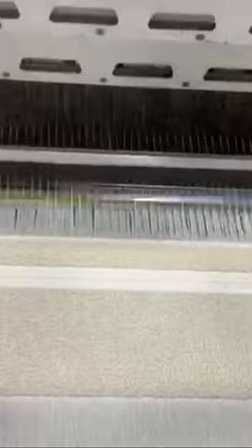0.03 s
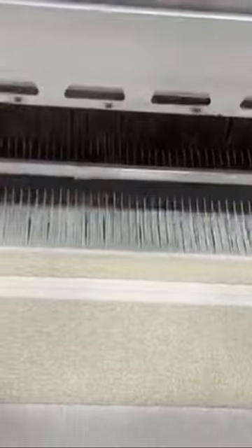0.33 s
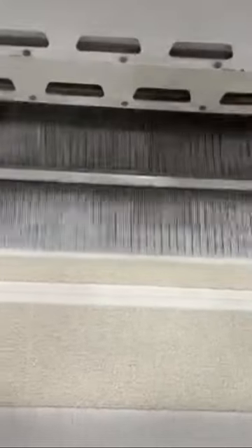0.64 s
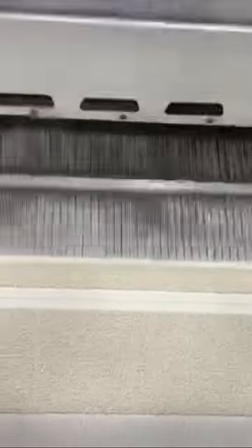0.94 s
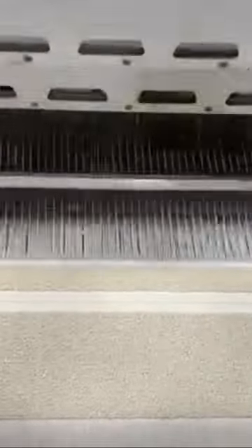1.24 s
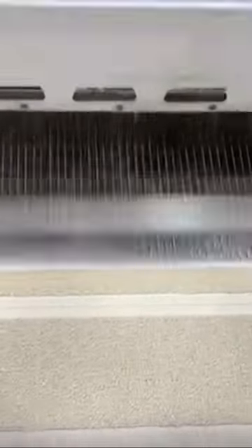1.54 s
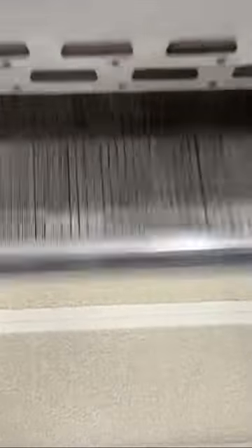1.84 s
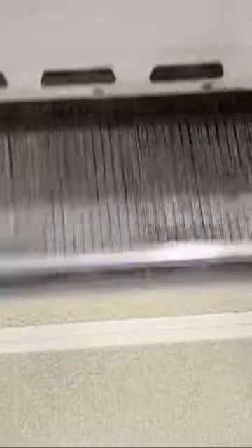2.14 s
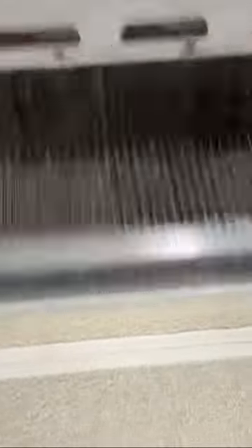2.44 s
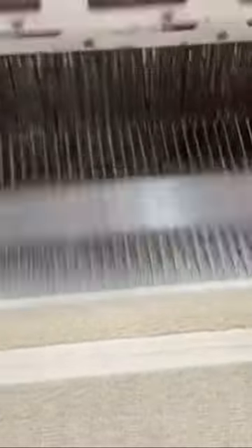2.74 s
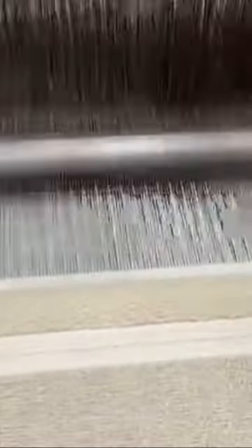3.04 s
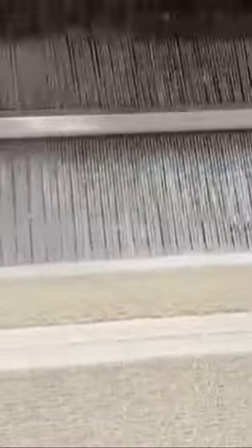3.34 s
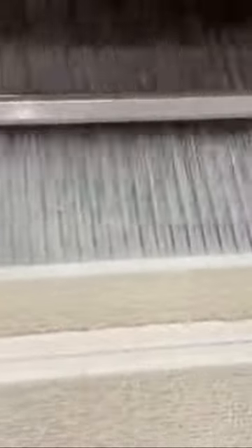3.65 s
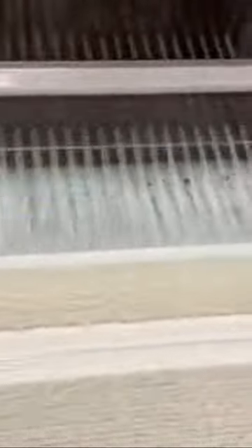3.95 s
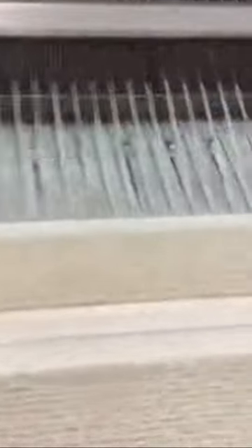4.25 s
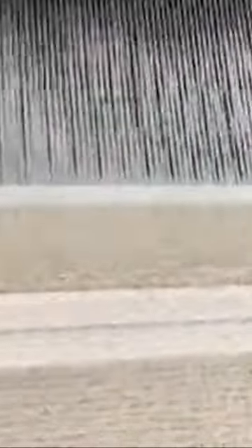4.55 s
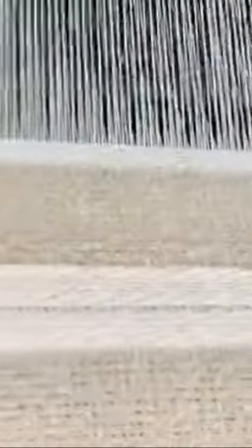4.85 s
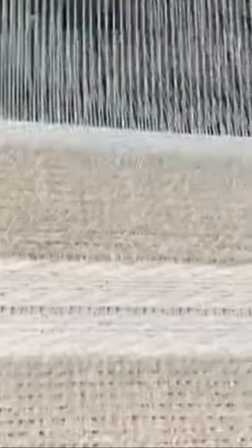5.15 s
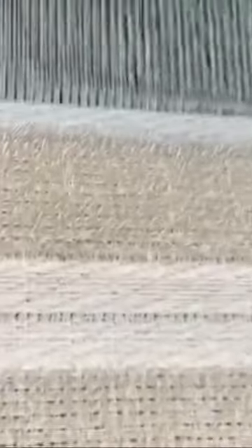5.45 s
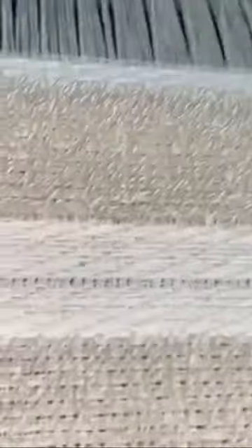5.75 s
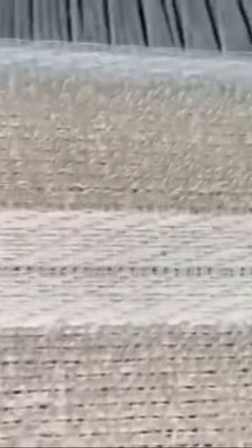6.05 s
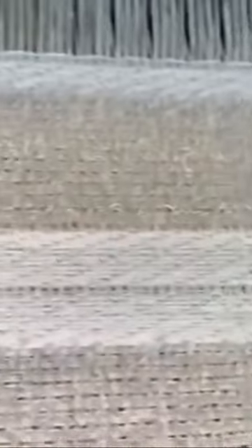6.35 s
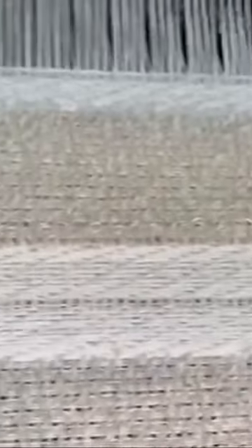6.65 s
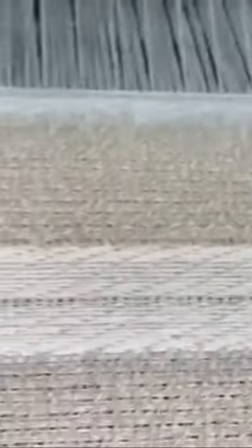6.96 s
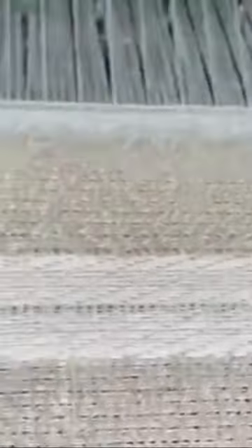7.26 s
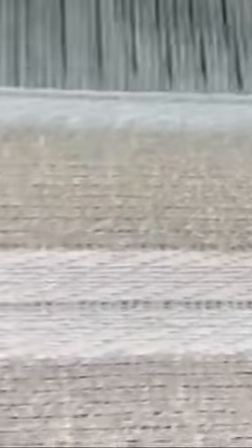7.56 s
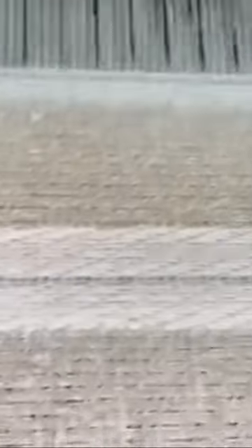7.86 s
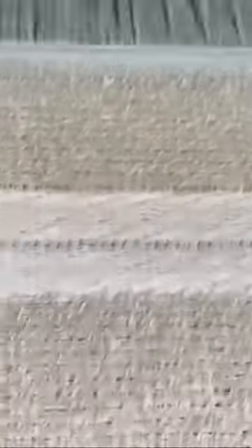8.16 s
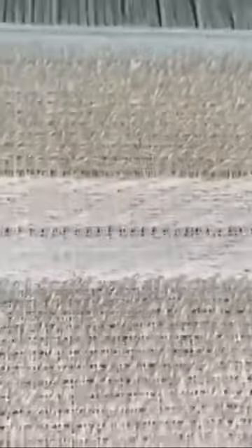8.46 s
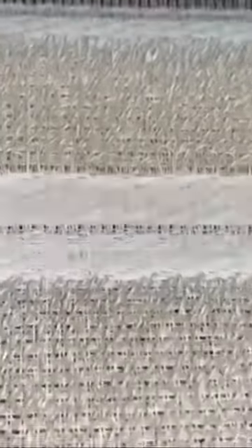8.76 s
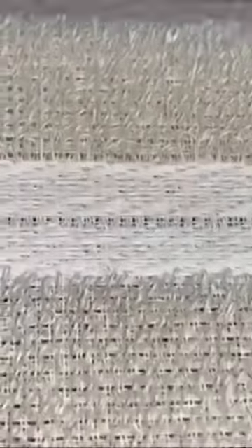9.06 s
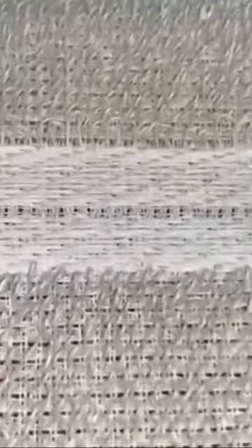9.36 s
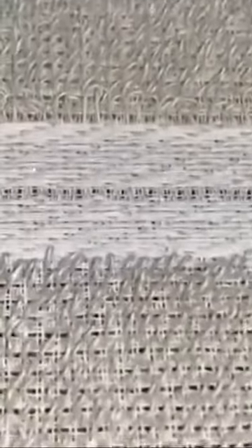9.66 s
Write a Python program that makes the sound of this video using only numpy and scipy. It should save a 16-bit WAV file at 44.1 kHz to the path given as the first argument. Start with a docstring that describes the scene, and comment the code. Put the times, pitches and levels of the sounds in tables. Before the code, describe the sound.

Weaving machines clatter continuously, their drives roaring and thumping while metal parts rattle and yarn hisses close by.

```python
"""A power loom at about 190 picks a minute in a factory hall, stereo microphone just above the cloth.
From the start the drive roars and thumps and yarn hisses. At every pick the shed closes with a rattle of
healds, the reed clacks against the cloth and the next shed opens; the weave decides how many frames move.
A slightly slower loom next to it drifts in and out of step. Soon low knocks boom, a cover bangs and heald
frames slap; later, as the microphone closes in on the reed, warp threads scrape and steel strips ping."""
import sys
import numpy as np
from scipy import signal
from scipy.fft import rfft, irfft, next_fast_len
from scipy.io import wavfile
from scipy.ndimage import uniform_filter1d, map_coordinates

SR = 44100
rng = np.random.default_rng(int(sys.argv[2]) if len(sys.argv) > 2 else 0)


def wav_record(signal):
    """Record a signal, one row per channel, as 16-bit PCM in the file named by sys.argv[1]."""
    frames = np.transpose(np.atleast_2d(signal))
    bounded = np.clip(frames, -1, 1)
    # unit amplitude maps onto the largest positive 16-bit level
    quanta = np.round(bounded * 32767).astype(np.int16)
    wavfile.write(sys.argv[1], SR, quanta)


N = 436590
T = np.arange(N) / SR

# picks of the loom under the microphone: (beat-up [s], clack [dB], ring centre [Hz],
# rattle of the closing shed [dB], rattle of the opening shed [dB], sley thump [dB])
PICKS = [(.176,-21.5,2250,3,-3,-32), (.496,-22.5,2300,6,0.5,-28), (0.804,-28,2030,3,0,-30),
         (1.126,-15.5,2340,2.5,4,-32), (1.434,-23,2230,4.5,1,-23), (1.754,-21,1830,5.5,1.5,-23),
         (2.069,-20.5,2060,3,-1,-22), (2.383,-15.5,2530,-0.5,4,-33), (2.695,-18.5,2400,0.5,0.5,-19),
         (3.012,-12.5,2420,3.5,-.5,-30), (3.325,-24.5,2020,0,3.5,-22), (3.643,-24,1950,1,5.5,-16),
         (3.953,-19.5,2040,1.5,1.5,-28), (4.273,-17,1900,2.5,1,-14), (4.586,-19.5,1840,1.5,-.5,-23),
         (4.901,-18.5,1800,1.5,1.5,-28), (5.216,-13.5,1730,6,2.5,-24), (5.531,-19,1780,1,5,-22),
         (5.846,-19,2170,2,-0.5,-20), (6.161,-15.5,1970,1.5,-0.5,-33), (6.478,-17,1910,-.5,-2,-24),
         (6.794,-22.5,2280,-.5,3,-19), (7.108,-18,2060,0.8,-1,-17), (7.424,-17,1800,4.5,1,-16),
         (7.737,-14.5,1950,2,1,-33), (8.051,-13.5,2240,-1.5,1,-30), (8.365,-15.5,1950,0.5,-2,-15),
         (8.682,-22,2060,4.5,-.5,-12), (8.997,-18,1960,3.5,-3,-15), (9.312,-15.5,2180,1.5,3.5,-22.5),
         (9.623,-14.5,1460,1,1,-11), (9.94,-20,2000,4.5,6,-20)]
# turns of the next loom, heavier or lighter with its weave: (swell of the roar [dB])
NEXT_SWELLS = [0.78, 0.65, 0.64, 0.77, 1, 1.8, 0.63, 1, .3, 0.59, 0.85, 1.6, 2.8, 0.94, 2.7, 3.7, 3.2, 2.9,
               1.6, 0.86, 2.3, 1.9, 1.3, 1.6, 1.7, 1.5, 1.3, 0.25, 1.3, 0.79]
NEXT_TURNS_S = .155 + .3306 * np.arange(len(NEXT_SWELLS))
# phases of a pick: (time after the beat-up [s], half length [s])
CLOSING, OPENING = (-.077, .059), (.06, .063)
BEAT_UP, SWISH, HANDOVER = (-.002, .024), (-.0032, .045), (.15, .031)
LEFT_LAG_S = .00011  # a clack's ring reaches the left capsule this much later


def amp(db):
    """Decibels to gain."""
    return 10 ** (np.asarray(db) / 20)


def unit(x):
    """Scale to rms 1."""
    return x / np.sqrt(np.mean(x ** 2) + 1e-20)


def along(points, hz):
    """(Hz, value) points read on a log axis."""
    f, v = np.transpose(points)
    return np.interp(np.log(hz + 1), np.log(f + 1), v)


def curves(rows):
    """One value per sample for each column after the time."""
    s, *columns = np.transpose(rows)
    return [np.interp(T, s, column) for column in columns]


def wobble(rate):
    """A smooth random curve, rate knots a second."""
    return map_coordinates(rng.standard_normal(int(N * rate / SR) + 4), [T * rate])


def filtered(x, response):
    """x through a complex frequency response."""
    n = x.shape[-1]
    m = next_fast_len(n + 8192)
    return irfft(rfft(x, m) * response(np.fft.rfftfreq(m, 1 / SR)), m)[..., :n]


def coloured(x, spectrum):
    """x shaped by (Hz, dB) points."""
    return filtered(x, lambda hz: amp(along(spectrum, hz)))


def resonate(x, modes):
    """x through a bank of (Hz, width in Hz, dB) resonances."""
    return filtered(x, lambda f: sum(amp(db) * 1j * f * width / (hz * hz - f * f + 1j * f * width)
                                     for hz, width, db in modes))


def add(track, s, sound):
    """Mix a sound into a track at time s."""
    part = track[..., max(round(s * SR), 0):][..., :sound.shape[-1]]
    part += sound[..., :part.shape[-1]]


def surge(starts, phase, height):
    """A curve that swells by height (one value, or one per start) at the same phase after every start."""
    late_s, half_s = phase
    t = T[::64]
    bells = np.exp(-((t[:, None] - starts - late_s) / half_s) ** 2)
    return np.interp(T, t, (bells * height).sum(axis=1))


def every_pick(phase, db):
    """A swell in dB at one phase of every pick."""
    return surge(np.transpose(PICKS)[0], phase, db)


def shedding():
    """Rise in dB as the heald frames move: once before each beat-up and once after it."""
    _, _, _, closing_db, opening_db, _ = np.transpose(PICKS)
    return every_pick(CLOSING, closing_db) + every_pick(OPENING, opening_db)


def placed(pair):
    """Two unrelated signals become left and right: alike in the bass, leaning left in the treble."""
    # likeness of the two capsules: (frequency [Hz], correlation [0..1])
    likeness = [(60, .998), (110, 1), (170, 0.68), (330, 0.88), (550, 0.99), (1100, 0), (5000, 0)]
    # balance at the microphone: (frequency [Hz], left minus right [dB])
    balance = [(190, 0), (330, -1.1), (580, 4), (1050, 4), (1750, 3.5), (2500, -1.5), (3300, 2),
               (5700, 9.5), (9500, 5.5)]
    width = lambda hz: np.arccos(np.clip(along(likeness, hz), -1, 1)) / 2
    pan = lambda hz: np.arctan(amp(along(balance, hz)))
    mid, side = filtered(pair, lambda hz: np.array([np.cos(width(hz)), np.sin(width(hz))]))
    stereo = np.array([mid + side, mid - side])
    return unit(filtered(stereo, lambda hz: np.array([np.sin(pan(hz)), np.cos(pan(hz))])))


def clatter(rate, life_s, spread_db, wash_db):
    """Many small contacts, each a short burst, over the wash that the hall makes of them."""
    hits = (rng.random(N) < rate / SR) * amp(spread_db * np.clip(rng.standard_normal(N), -2, 2)) ** 2
    power = signal.lfilter([1], [1, -np.exp(-2 / (life_s * SR))], hits)
    return unit(rng.standard_normal((2, N)) * np.sqrt(power / power.mean() + amp(wash_db) ** 2))


def mottled(pair, depth_db):
    """A random mottle in pitch and time gives a noise a coarser grain."""
    spectra = signal.stft(pair, nperseg=1024)[2]
    mottle = uniform_filter1d(uniform_filter1d(rng.standard_normal(spectra.shape[1:]), 3, 0), 4, 1)
    return unit(signal.istft(spectra * amp(depth_db * unit(mottle)), nperseg=1024)[1][:, :N])


def drive_roar(level_db, frame_db, closing_db, opening_db, waver_db):
    """Gears and cams knock densely on the frame, which booms; the next loom adds its own beat."""
    # roar of the gears: (frequency [Hz], level [dB])
    spectrum = [(14, -48), (25, -26.5), (42, -18), (65, -10), (90, -6), (128, -5), (170, -2), (260, -1.5),
                (360, 0), (430, -2), (650, -5), (1000, -10), (1500, -21), (2500, -65)]
    # resonances of the frame and its covers: (frequency [Hz], width [Hz], level [dB])
    frame_modes = [(93, 33, 0.5), (170, 10.5, 3.5), (203.4, 5.9, -5.5), (320, 35, -0.5), (363, 16, .5),
                   (480, 27, -7.5), (639, 22, -5.5), (783.5, 28, -2)]
    # the microphone moves over the cloth: (time [s], level [dB], boom [dB], bark [dB])
    mic_path = [(0, -23, 0.5, -2.5), (1.3, -24, 1, -1), (2.2, -23.5, -1, -1), (3.4, -25, 4, 2),
                (4.4, -25, 4, 0.5), (5.3, -24.5, 3.5, 0.5), (6.5, -24, 3.5, 2.5), (8, -24, 4, 2.5),
                (9, -24.5, 3.5, 4), (9.9, -23, 4, 4)]
    near_db, boom_db, bark_db = curves(mic_path)
    knocks = unit(coloured(clatter(rate=120, life_s=.0092, spread_db=2.5, wash_db=7), spectrum))
    frame = unit(resonate(clatter(rate=70, life_s=.012, spread_db=3.5, wash_db=-1), frame_modes))
    roar = placed(knocks + amp(frame_db) * frame)
    boom = (amp(boom_db) - 1) * resonate(roar, [(190, 100, 0)])
    bark = (amp(bark_db) - 1) * resonate(roar, [(650, 400, 0)])
    next_loom_db = surge(NEXT_TURNS_S, (0, .098), np.array(NEXT_SWELLS))
    effort_db = every_pick(CLOSING, closing_db) + every_pick(OPENING, opening_db) + next_loom_db
    return amp(level_db + near_db + effort_db + waver_db * wobble(9)) * (roar + boom + bark)


def heald_rattle(level_db, follow, beat_db):
    """Steel healds rattle in their frames as the shed closes and opens, and shake at the beat-up."""
    # dry steel rattle: (frequency [Hz], level [dB])
    spectrum = [(600, -13), (1000, -3), (1250, -2.5), (1700, -1), (2500, -1), (3100, -7.5), (4000, -26.5),
                (7000, -74.5)]
    rattle = mottled(clatter(rate=340, life_s=.0087, spread_db=3, wash_db=2.5), depth_db=2.5)
    effort_db = follow * shedding() + every_pick(BEAT_UP, beat_db)
    return amp(level_db + effort_db + .72 * wobble(30)) * placed(coloured(rattle, spectrum))


def yarn_hiss(level_db, follow, swish_db, handover_db):
    """Yarn slides through steel guides with the shed and the reed; the weft is handed on with ticks."""
    # sliding yarn: (frequency [Hz], level [dB])
    spectrum = [(1800, -18.5), (3000, -1), (3900, 0), (4800, -1), (6300, -0.5), (7500, -5.5), (8500, -13),
                (9200, -19.5), (9800, -89)]
    # light contacts of the weft mechanism: (time after the beat-up [s], level [dB], length [s])
    weft_ticks = [(-.01, -30.5, 0.0063), (0.157, -33.5, .005), (0.206, -33.5, 0.0067)]
    effort_db = follow * shedding() + every_pick(SWISH, swish_db) + every_pick(HANDOVER, handover_db)
    rub_gain = amp(level_db + effort_db + .47 * wobble(30))
    rub = rub_gain * clatter(rate=810, life_s=.0029, spread_db=10, wash_db=13.5)
    ticks, t = np.zeros(N), np.arange(SR // 10) / SR
    for beat_s, *_ in PICKS:
        for s, db, length in weft_ticks:
            size, late = rng.standard_normal(2)
            pulse = t / length * np.exp(1 - t / length)
            add(ticks, beat_s + s - length + .001 * late, amp(db + 1.8 * size) * pulse)
    yarn = rub + ticks * rng.standard_normal((2, N))
    return np.std(yarn) * placed(coloured(mottled(yarn, depth_db=2.5), spectrum))


def steel_hits(hits, spectrum, ring_db, rise_s, spray_db, spray_s, hall_db, hall_t60):
    """Steel lands on steel at each (s, dB, Hz): a ring, reflections off the covers, then the hall."""
    # modes of the steel: (ratio to the ring centre, level [dB], t60 [s])
    modes = [(.38, -12, .04), (.85, -6, .026), (1, 0, .036), (1.2, -5, .026), (1.45, -7.5, .02)]
    track, t = np.zeros((2, N)), np.arange(-SR // 50, SR // 6) / SR
    landing, after = np.exp(-(np.minimum(t, 0) / rise_s) ** 2), np.maximum(t, 0)
    tail = amp(spray_db) * np.exp(-after / spray_s) + amp(hall_db - 60 * after / hall_t60)
    arrival = t - np.array([[LEFT_LAG_S], [0]])
    for s, db, hz in hits:
        ring = 0
        for ratio, mode_db, t60 in modes:
            phase = rng.random() + rng.normal(0, .08, (2, 1))
            decay = amp(mode_db + rng.normal(0, 1, (2, 1)) - 60 * after / t60)
            ring = ring + decay * np.sin(2 * np.pi * (ratio * hz * arrival + phase))
        spray = unit(coloured(rng.standard_normal((2, len(t))), spectrum))
        add(track, s + t[0], amp(db) * landing * (amp(ring_db) * ring + tail * spray))
    return track


def reed_clacks(lead_s, rebound_s, rebound_db):
    """The reed meets the cloth just before the end of its stroke, then bounces once."""
    # scattered clack: (frequency [Hz], level [dB])
    spectrum = [(700, -36), (1250, -17), (1600, 7.5), (2300, -5), (2700, 5), (3300, -10), (6000, -29.5)]
    contacts = [(s - lead_s, db, hz) for s, db, hz, *_ in PICKS]
    rebounds = [(s + rebound_s, db + rebound_db, hz) for s, db, hz, *_ in PICKS]
    return steel_hits(contacts + rebounds, spectrum, ring_db=.5, rise_s=.0012,
                      spray_db=-7, spray_s=.007, hall_db=-21, hall_t60=.3)


def drive_thumps(cam_db, return_db, floor_db, scatter_db, rise_s):
    """The sley and the shedding cams reverse and shake the frame, and the floor answers."""
    # knocks of sley, cam, sley's return and floor: (time after the beat-up [s], pitch [Hz], t60 [s])
    knocks = [(0.0235, 90.3, 0.13), (0.17, 93, 0.17), (.092, 101.2, 0.23), (.184, 62, .13)]
    track, t = np.zeros(N), np.arange(SR // 4) / SR
    for beat_s, *_, sley_db in PICKS:
        for (s, hz, t60), db in zip(knocks, (sley_db, cam_db, return_db, floor_db)):
            softer, detune, late = rng.standard_normal(3)
            envelope = amp(db - scatter_db * softer - 60 * t / t60) * (1 - np.exp(-t / rise_s))
            ring = np.sin(2 * np.pi * hz * (1 + .039 * detune) * t)
            add(track, beat_s + s + .0016 * late, envelope * ring)
    return track


def low_knocks(level_db, cycles, bass_db, bass_hz):
    """Booming low knocks, many of them from the next loom beating up, each over a faint bass pulse."""
    # booming knocks: (time [s], level [dB], pitch [Hz])
    knocks = [(0.408,-20,310), (.443,-21,326), (.497,-23,100), (.853,-24,315), (1.187,-19,380),
              (1.215,-21,470), (1.367,-19.5,346), (1.432,-18,326), (1.595,-27,93), (1.92,-27,93),
              (2.406,-24,320), (2.462,-18,340), (2.55,-21.5,280), (2.795,-28,92), (3.097,-28,100),
              (3.143,-25,288), (3.175,-26,330), (3.276,-21,313), (4.077,-29,100), (4.116,-20,243),
              (4.15,-23,265), (4.431,-16,230), (4.543,-18.5,320), (4.759,-21,290), (4.797,-19,337),
              (4.889,-20,330), (5.083,-19,272), (5.172,-20,305), (5.41,-19,286), (5.446,-15.5,367),
              (5.465,-23,446), (5.491,-18.5,318), (5.769,-23,334), (5.968,-26,92), (6.11,-26,300),
              (6.517,-20,330), (6.727,-17,344), (6.779,-22,268), (6.828,-25,295), (7.09,-22,300),
              (7.698,-17,330), (7.706,-25.5,89.5), (7.736,-25,292), (7.773,-21,314), (7.96,-33,96),
              (8.122,-20.5,243), (8.465,-23,250), (8.529,-26,92), (8.704,-22,344), (9.307,-20.5,320),
              (9.35,-18,450), (9.471,-19,486), (9.672,-22,260)]
    track, t = np.zeros(N), np.arange(-SR // 20, SR // 6) / SR
    bass = amp(bass_db) * np.exp(-(bass_hz * t) ** 2) * np.sin(2 * np.pi * bass_hz * t)
    for s, db, hz in knocks:
        age = hz * t / cycles
        envelope = np.exp(np.where(age < 0, -(2 * age) ** 2, -age))
        boom = envelope * np.sin(2 * np.pi * (hz * t + rng.random()))
        add(track, s + t[0] - .003, amp(level_db + db) * (boom + bass))
    return track


def next_loom_thuds(level_db, hz, late_s, half_s):
    """Once a turn the next loom sends a deep thud through the floor."""
    track, t = np.zeros(N), np.arange(-SR // 10, SR // 10) / SR
    envelope = amp(level_db) * np.exp(-(t / half_s) ** 2)
    for s in NEXT_TURNS_S:
        add(track, s + late_s + t[0], envelope * np.sin(2 * np.pi * (hz * t + rng.random())))
    return track


def cover_bangs(level_db, rise_s, decay_s):
    """A loose sheet cover, a little to the left, chatters against the frame with a hollow bang."""
    # hollow colour of the cover: (frequency [Hz], level [dB])
    spectrum = [(250, -40), (470, 1.5), (620, 4), (760, -0.5), (1200, -41)]
    # bangs of the cover: (time [s], level [dB])
    bangs = [(.845,-27.5), (1.16,-23), (1.335,-27.5), (1.583,-25.5), (2.111,-27), (2.92,-28.5),
             (3.135,-23.5), (3.736,-24.5), (4.315,-24.5), (5.552,-23), (6.874,-25), (7.138,-23.5),
             (7.744,-21), (8.068,-21.5), (8.2,-22), (8.729,-22.5), (9.018,-22.5), (9.35,-22.5),
             (9.387,-22.5), (9.466,-24), (9.664,-26)]
    track, t = np.zeros((2, N)), np.arange(-SR // 20, SR // 6) / SR
    envelope = np.exp(np.where(t < 0, -(t / rise_s) ** 2, -t / decay_s))
    envelope_rms = np.sqrt(np.mean(envelope ** 2))
    for s, db in bangs:
        chatter = coloured(rng.standard_normal(len(t)), spectrum)
        add(track, s + t[0] - .003, amp(level_db + db) * envelope_rms * unit(chatter * envelope))
    return track * amp([[1.7], [-1.7]])


def heald_slaps(ring_hz, spread_hz):
    """Heald frames slap against their guides, each time ringing at a slightly different pitch."""
    # slaps on the guides: (time [s], level [dB])
    slaps = [(1.202,-26), (1.68,-25.5), (2.907,-24.5), (3.312,-22), (3.725,-25.5), (4.17,-22), (5.14,-20.5),
             (5.545,-26.5), (5.832,-21.5), (6.873,-22.5), (7.329,-18.5), (7.686,-21), (7.725,-20),
             (7.822,-24), (8.975,-20.5), (9.032,-17.5), (9.382,-21), (9.674,-22.5), (9.838,-18)]
    # scattered slap: (frequency [Hz], level [dB])
    spectrum = [(700, -12), (1300, 7), (1800, 10), (2600, -1), (3500, -3), (6300, -8), (9000, -30)]
    hits = [(s, db, rng.normal(ring_hz, spread_hz)) for s, db in slaps]
    return steel_hits(hits, spectrum, ring_db=-1, rise_s=.007,
                      spray_db=-6, spray_s=.015, hall_db=-15, hall_t60=.22)


def warp_scrapes(level_db, half_s):
    """Taut threads drag through the healds and the reed: a brief, grainy, metallic swish."""
    # drags of the warp: (time [s], level [dB])
    drags = [(2.464,-31.5), (3.648,-35), (3.72,-32), (4.9,-27), (5.14,-25), (5.54,-30.5), (5.838,-31),
             (6.35,-31), (6.82,-32), (6.96,-31.5), (9.312,-28), (9.38,-33.5), (9.625,-25.5)]
    # thread on steel: (frequency [Hz], level [dB])
    spectrum = [(1800, -26), (3400, 1.5), (6300, -4.5), (7800, -12.5), (9500, -28.5)]
    grains = mottled(clatter(rate=600, life_s=.003, spread_db=6, wash_db=1), depth_db=1.5)
    times, db = np.transpose(drags)
    return surge(times, (0, half_s), amp(level_db + db)) * placed(coloured(grains, spectrum))


def strip_pings(rise_s):
    """Now and then one steel strip is left free to ring at a clear pitch."""
    # ringing strips: (time [s], level [dB], pitch [Hz], t60 [s])
    pings = [(4.587,-9.5,2040,.047), (6.778,-24,2800,0.13), (6.823,-20,2785,0.21), (8.934,-21,1800,.14),
             (8.98,-20.5,1840,0.13), (9.642,-14,1370,0.083)]
    track, t = np.zeros((2, N)), np.arange(SR // 4) / SR
    for s, db, hz, t60 in pings:
        ring = np.sin(2 * np.pi * hz * (t - np.array([[LEFT_LAG_S / 2], [0]])))
        add(track, s - rise_s, amp(db - 60 * t / t60) * (1 - np.exp(-t / rise_s)) * ring)
    return track


def scene():
    """Above the cloth: the lows reach the left capsule later, and the right hears less of the steel."""
    # the microphone closes in on the reed and turns:
    # (time [s], heald rattle [dB], steel and yarn on the right [dB])
    approach = [(0, -29, -6), (3, -28, -2.5), (5.3, -26.5, -2), (7.5, -26.5, -0.5), (9.9, -27, -1)]
    rattle_db, right_db = curves(approach)
    low = low_knocks(level_db=2.6, cycles=3.3, bass_db=-29, bass_hz=46)
    low = low + cover_bangs(level_db=-.5, rise_s=.015, decay_s=.028)
    low += drive_roar(level_db=-1.8, frame_db=-6.5, closing_db=1.3, opening_db=2.1, waver_db=.3)
    low += drive_thumps(cam_db=-24.5, return_db=-27, floor_db=-26, scatter_db=.5, rise_s=.0071)
    low += next_loom_thuds(level_db=-41.5, hz=46, late_s=.315, half_s=.04)
    low[0] = filtered(low[0], lambda hz: np.exp(-2j * np.pi * hz * .00022))  # 0.22 ms later on the left
    bright = reed_clacks(lead_s=.0015, rebound_s=.032, rebound_db=-12)
    bright += heald_slaps(ring_hz=2014, spread_hz=150) + strip_pings(rise_s=.002)
    bright *= amp([[.8], [-.8]])  # the struck steel sits slightly left
    bright += heald_rattle(rattle_db, follow=.82, beat_db=3)
    bright += yarn_hiss(level_db=-29.5, follow=.52, swish_db=2.5, handover_db=1.6)
    bright += warp_scrapes(level_db=1, half_s=.016)
    bright[1] *= amp(right_db)
    return low + bright


def record(dry):
    """The sound starts after 35 ms of silence and holds nothing above the band limit."""
    silence_s, top_hz = .035, 9750
    return filtered(dry * (T > silence_s), lambda hz: hz < top_hz)


dry = scene()
out = record(dry)
wav_record(out)
```